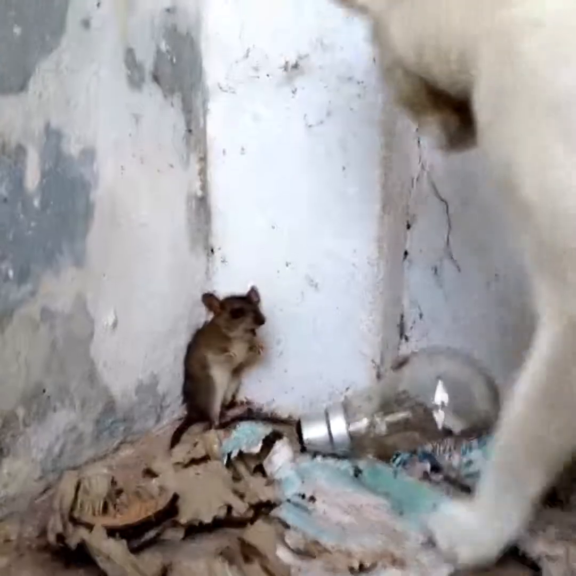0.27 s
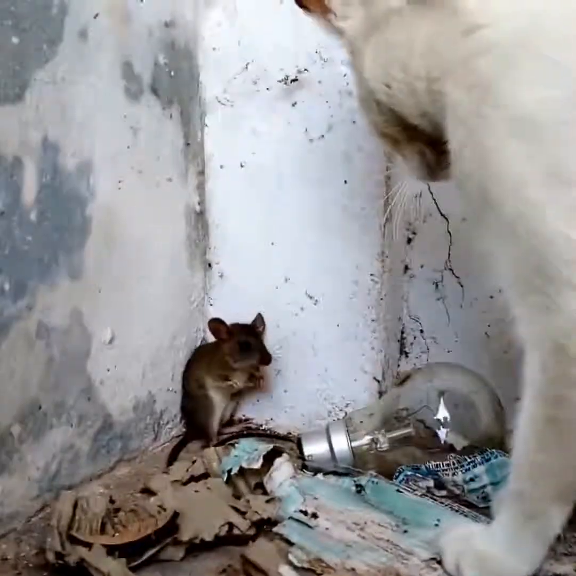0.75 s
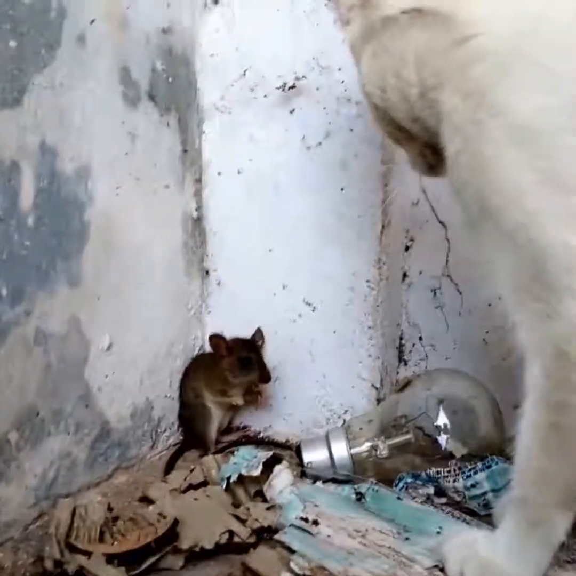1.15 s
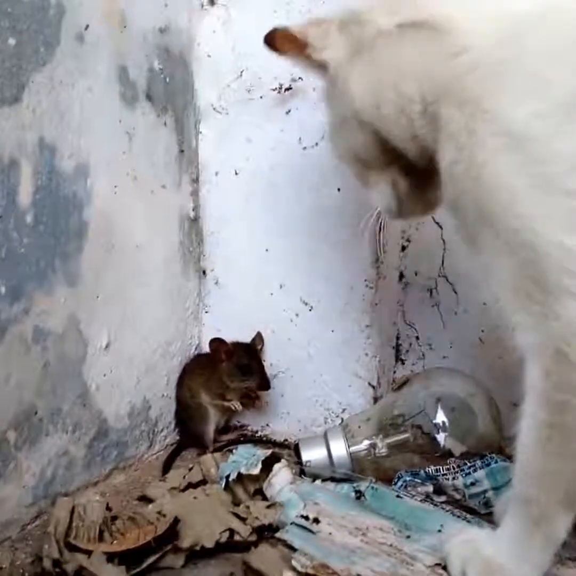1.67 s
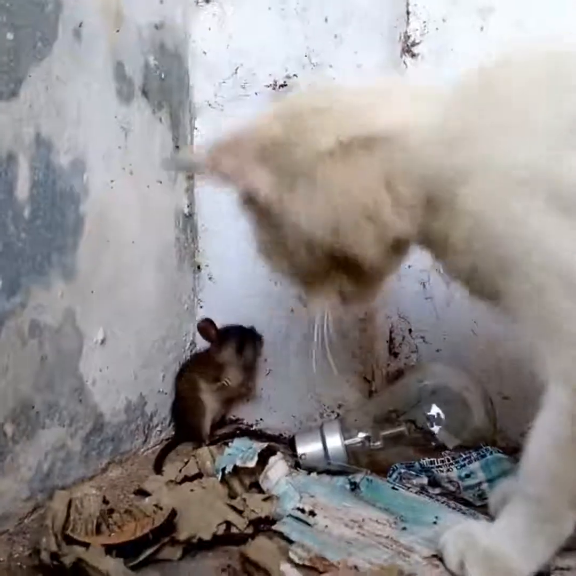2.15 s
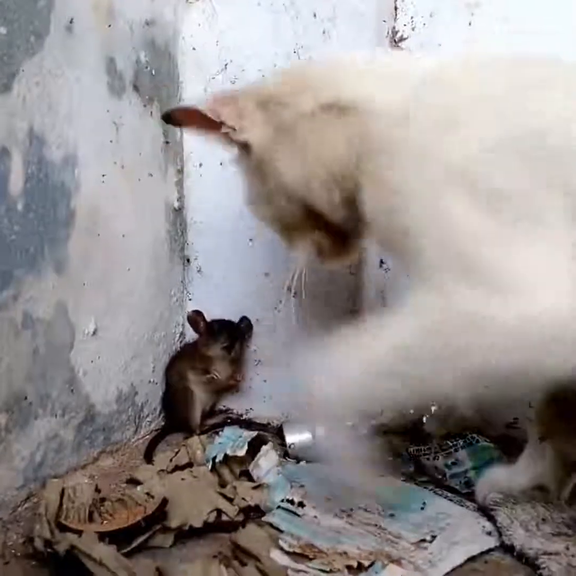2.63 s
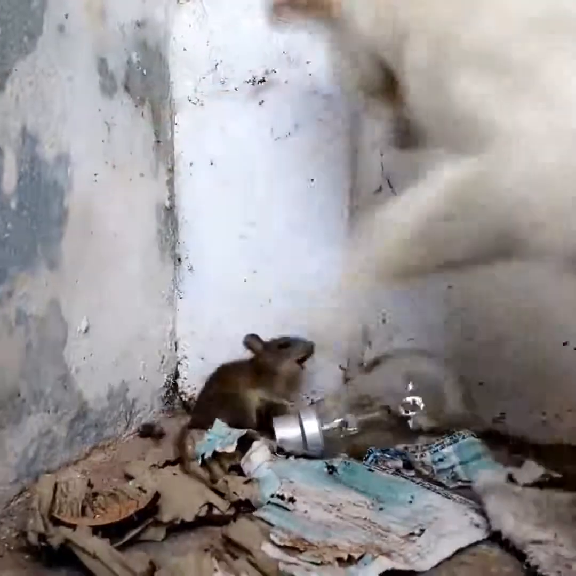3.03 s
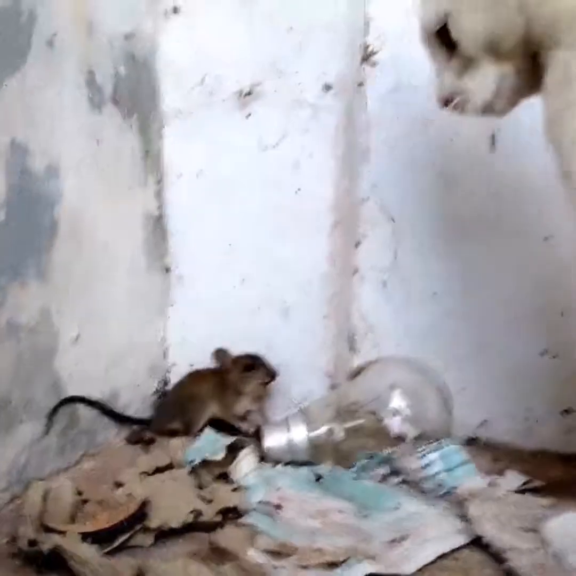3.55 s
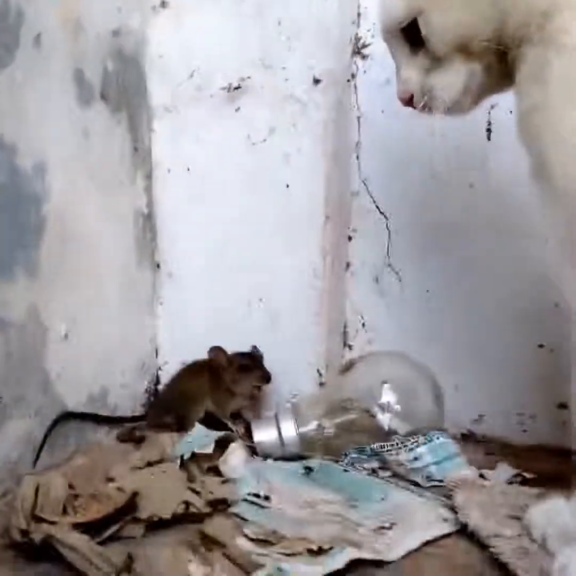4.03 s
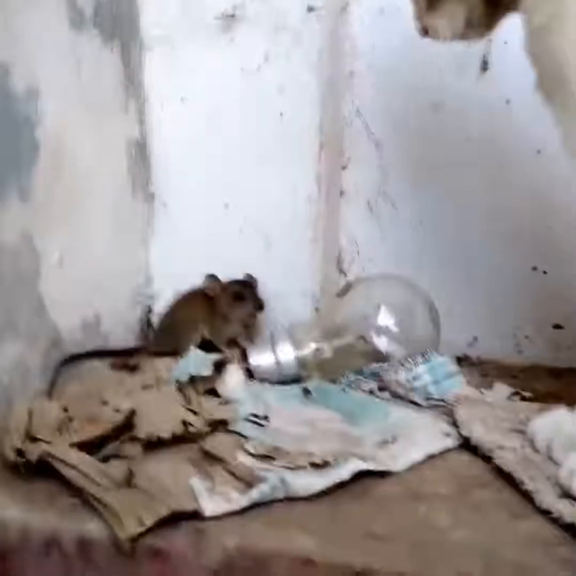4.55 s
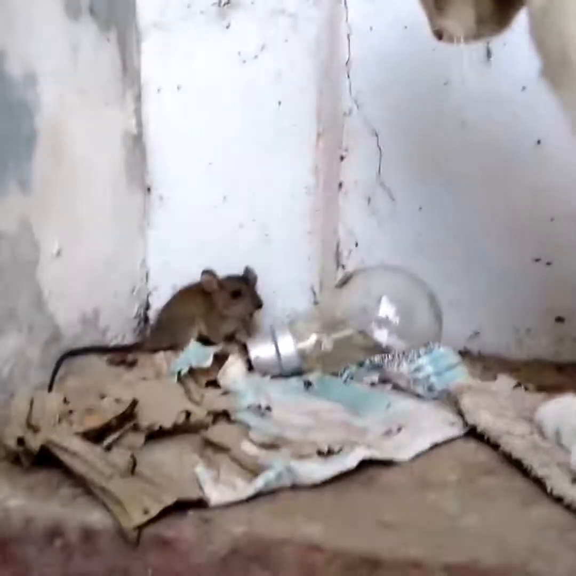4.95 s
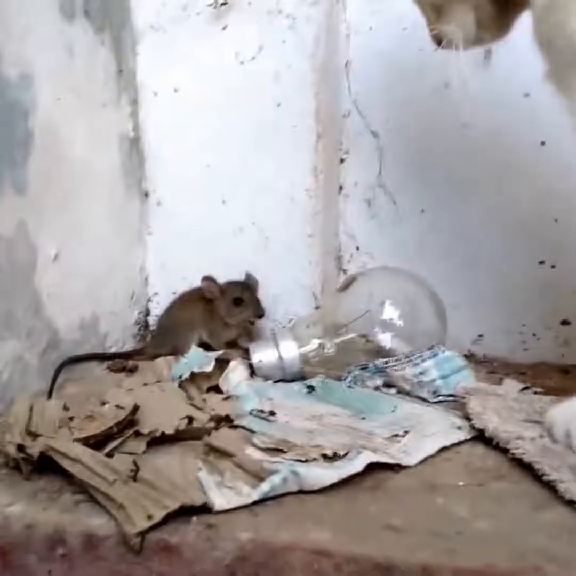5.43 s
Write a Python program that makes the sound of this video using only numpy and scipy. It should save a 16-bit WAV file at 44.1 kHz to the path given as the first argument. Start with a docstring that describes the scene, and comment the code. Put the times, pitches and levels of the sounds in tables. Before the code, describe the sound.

A mouse squeaks very close to a handheld microphone in a bare, hard-walled corner, with quick wall echoes and a short tail. Soft low noise and faint hiss lie underneath. Brief gritty rasps come at 0.0 and 0.2 seconds, then a longer torn shriek from 0.4 to 0.8 that ends alongside a thin whistle. Further cries around 1.0, 1.4 and 1.8 start with a tiny falling chirp or harsh rasp and clear into whistles near 2.8 kilohertz. Short rasps follow at 2.2 and 2.4, a rough cry at 2.6 to 2.9, then a dense scream at 3.0 to 3.2 with crackly paper scuffs. Squeaks continue at 3.3, 3.5, 3.75, 4.1, 4.4, 4.8 and 5.2, with a last whistle at 5.6. From 3.6 to 5.5 a faint hoarse rooster-like call wavers far away. Dull hand bumps, notably at 4.1 and 4.5, and low rumble from 4.5 accompany the end.

```python
"""In the corner of two plastered walls, a cornered mouse squeaks at a cat, close to a handheld camera.
Its cries are built from short falling chirps, harsh rasps (uneven pulses and puffs of noise ringing
in the throat) and thin clean whistles (a few sine waves). Paws scuff on paper as crackly noise,
the hand bumps the camera as dull fading noise, and a low rumble comes in late. A faint long call,
like a rooster's, comes from far away as wavering harmonics, over a soft background noise."""
import sys
import numpy as np
from scipy import signal
from scipy.fft import rfft, irfft, next_fast_len
from scipy.io import wavfile

SR = 44100
rng = np.random.default_rng(int(sys.argv[2]) if len(sys.argv) > 2 else 0)


def store_wav(level_fs):
    """Save 16-bit WAV to argv[1]."""
    pcm = np.round(np.clip(np.atleast_2d(level_fs), -1, 1) * 32767)
    wavfile.write(sys.argv[1], SR, pcm.T.astype(np.int16))


N = 250929  # length in samples

# Harsh part of each cry; the resonance, shriek and hiss levels are relative to the effort:
# start_s, length_s, effort_db, opening_accent_db, swell_s, low_db, middle_db,
# pulse_start_hz, pulse_end_hz, roughness (0 to 1, anything over counts as 1), low_start_hz, low_end_hz,
# middle_start_hz, middle_end_hz, top_hz, top_width_hz, shriek_db, hiss_db
RASPS = [ (0.027, 0.052, -30, -3.5, 0.015, -7, -4, 797, 842, 0.51, 1480, 1800, 4350, 4600, 7220, 1865, -27, -6),
         (0.225, 0.07, -37, -3, 0.0087, -0.5, -2.5, 800, 844.5, 0.56, 1410, 1830, 4800, 4420, 7130, 910, -7, -9.5),
         (0.441, 0.34, -36.5, 2.5, 0.009, -12, -5.5, 940, 983, 0.91, 1520, 1730, 4450, 5340, 7480, 647, -8, -11),
         (0.954, 0.07, -39, -2.5, 0.016, -3.5, -5, 995, 805, 0.96, 1560, 1800, 4900, 5360, 7100, 1320, -4.5, -8.5),
         (1.361, 0.17, -45.5, 1, 0.007, -4.5, -1, 852, 1097, 1.04, 1510, 1950, 5300, 5250, 6870, 1100, 3.5, -7),
         (1.79, 0.043, -49, -3, 0.0082, -27, 1, 917, 820, 0.75, 1600, 1700, 5400, 5030, 6700, 1200, 6.5, -2),
         (2.175, 0.079, -36.5, -3, 0.017, -4, -3.5, 777, 895, 0.75, 1340, 1970, 4550, 4520, 6800, 1250, -10, -8),
         (2.385, 0.063, -33, -1.5, 0.0066, -6.5, -4.5, 816, 863, 0.32, 1490, 1770, 4650, 4430, 6840, 1040, -28, -12),
         (2.634, 0.1, -51.5, 12.5, 0.0074, -14, -3.5, 892, 914, 0.99, 1450, 1800, 5000, 5400, 7340, 1200, 4.5, -8),
         (2.716, 0.15, -42, 2, 0.031, -6, -0.5, 905, 1021, 1.04, 1400, 1710, 5150, 5300, 7200, 1300, 0, -11),
         (3.024, 0.042, -30.5, -0.5, 0.013, -12, 2.5, 1401, 1327, 0.42, 1420, 1350, 4350, 4200, 7700, 900, -13, -9),
         (3.04, 0.089, -37.5, 7.5, 0.0029, -18, -1.5, 1392, 1140, 0.8, 1530, 2180, 4550, 5010, 6950, 1400, -18, -6),
         (3.104, 0.095, -41, -2.5, 0.011, -16, 3, 1196, 1240, 0.9, 2170, 2450, 4400, 4980, 6540, 1500, 0, -9.5),
         (3.316, 0.07, -33.5, -4.5, 0.014, -12, -12, 772, 814, 0.29, 1820, 2000, 4550, 4400, 6720, 1000, -5, -10.5),
         (3.515, 0.079, -45, 1, 0.014, -4.5, -4, 979, 905, 0.89, 1350, 1780, 4800, 4930, 6820, 900, 3, -9),
         (3.746, 0.089, -42.5, 1.5, 0.0083, -11.5, -18, 947, 1044, 1.06, 1380, 2100, 4850, 5250, 6800, 1100, 1.5, -10.5),
         (4.141, 0.067, -37, -0.5, 0.0091, -6.5, -8, 843, 844, 0.92, 1580, 2120, 5100, 5270, 6650, 700, -8, -13.5),
         (4.386, 0.17, -37.5, 1.5, 0.017, -11, -9, 896, 1116, 0.92, 1820, 2200, 4750, 5350, 6880, 1000, -4, -13),
         (4.83, 0.049, -38, 1.5, 0.0098, -6, -9, 1100, 1110, 0.46, 1470, 1730, 5200, 5640, 6700, 1300, -3, -12),
         (5.232, 0.068, -48, -5, 0.012, -16, 2, 914, 807, 0.93, 1490, 1700, 5400, 5300, 6500, 1300, -12, -5),
         ]
# Clean whistles; the level is that of the first harmonic at its loudest, before it wavers:
# start_s, length_s, pitch_hz, scoop_up_hz, level_db, second_harmonic_db and third_harmonic_db (re first)
WHISTLES = [ (0.737, 0.062, 2745, 84, -40, 1, -2), (1.032, 0.11, 2831, 216, -40.5, 0.5, -7),
            (1.108, 0.1, 2798, 123, -40.5, -1, -10), (1.486, 0.1, 2766, 206, -39.5, 4, -5.5),
            (1.781, 0.06, 2630, -120, -42, -6, -8), (1.86, 0.15, 2771, 74, -41, -0.5, -13),
            (2.678, 0.076, 2770, 336, -48.5, 12.5, 0), (2.83, 0.077, 2716, 236, -44, 6.5, 1.5),
            (3.127, 0.079, 2477, 62, -37, -1, 1), (3.795, 0.23, 2750, 337, -35.5, -5.5, -13),
            (4.52, 0.096, 2772, 267, -36, -10, -12), (4.868, .17, 2762, 152, -37.5, -8.5, -20),
            (5.218, 0.15, 2763, -60, -41.5, -6, -15), (5.642, 0.089, 2790, -72, -38, -2.5, -14.5), ]
# Falling chirps: start_s, pitch_hz (halfway down), level_db (at the start)
CHIRPS = [(0.95, 2800, -40.5), (1.357, 2910, -41), (2.627, 2640, -40), (3.513, 2760, -42.5),
          (3.741, 2730, -35), (4.136, 2730, -39), (4.822, 2790, -35.5)]
# Slides of paws on paper: start_s, length_s, level_db
SCUFFS = [(0.282, 0.16, -57.5), (0.361, 0.1, -54.5), (2.857, 0.18, -56), (2.976, 0.037, -45),
          (3.06, 0.019, -44), (3.119, 0.015, -38.5), (3.189, 0.15, -53.5), (3.445, 0.1, -60),
          (4.322, 0.08, -48), (4.357, 0.019, -47), (4.664, 0.073, -56)]
# Bumps of the hand on the camera: start_s, level_db (before it dies away), decay_s
BUMPS = [(0.215, -46, 0.014), (1.199, -41.5, 0.0064), (4.134, -29, 0.0048), (4.474, -34.5, 0.015),
         (4.681, -44.5, 0.042), (4.759, -42, 0.0092), (4.827, -44, 0.012), (4.858, -37, 0.017),
         (5.189, -41, 0.015), (5.534, -34.5, 0.011), (5.627, -45, 0.014)]
# Path of the handling rumble: time_s, level_db
RUMBLE_PATH = [(4.5, -55), (5.69, -52.5)]
# Path of the far call: time_s, pitch_hz, level_db (of the second harmonic, before it wavers)
CROW_PATH = [(3.56, 589, -65), (3.67, 622, -53), (3.79, 642.7, -59), (3.88, 750, -49.5), (3.96, 793, -45.5),
             (4.1, 749, -51.5), (4.24, 771, -47.5), (4.4, 731.6, -48.5), (4.54, 721, -48.5),
             (4.7, 727, -50.5), (4.96, 752, -61.5), (5.16, 738, -53), (5.49, 698, -63.5)]

# Harmonics of the shriek: harmonic_number, level_db
SHRIEK_HARMONICS = [(1, -6), (2, 2.5), (3, -1.5), (4, -7), (6, -2)]
# Tone colour of the breath in a rasp: frequency_hz, level_db
AIR_COLOUR = [(300, -19), (600, -3.5), (900, 2), (1400, 5.5), (2000, -5.5), (2900, -2), (4500, -2.5),
              (6100, -5.5), (8000, -11), (10000, -21), (16000, -40)]
# Tone colour of the hiss at the teeth: frequency_hz, level_db
HISS_COLOUR = [(300, -28), (7000, -22), (8500, 4.5), (10600, -2), (11150, -9.5), (11800, -7), (13300, -9),
               (15000, -1.5), (16000, -19)]
# Tone colour of the rasps, with a steep fall above 8 kHz: frequency_hz, gain_db
RASP_COLOUR = [(700, -1.5), (1700, 0), (3200, 5), (3700, -3), (4150, -4.5), (5400, -1), (5850, 5.5),
               (6400, 1), (8050, -0.5), (8350, -20), (16000, -28)]
# Tone colour of scuffed paper: frequency_hz, level_db
PAPER_COLOUR = [(300, -2), (2000, -10), (4200, 2.5), (7500, -4), (10000, -11.5), (16000, -17)]
# Tone colour of a knock on the camera: frequency_hz, level_db
THUD_COLOUR = [(30, -13), (130, -2.5), (330, -5), (500, -15), (800, -19.5), (3000, -43), (16000, -58)]
# Tone colour of the background: frequency_hz, level_db
BACKGROUND_COLOUR = [(15, 1), (38, -4.5), (60, -6.5), (130, -6), (180, -14.5), (450, -20), (1200, -25.5),
                     (3200, -27.5), (4300, -25.5), (7600, -29.5), (8400, -33.5), (11000, -37.5),
                     (15500, -40.5)]
# How long the room rings: frequency_hz, time_to_fall_60_db_s
ROOM_DECAY = [(200, 0.39), (1500, 0.12), (7000, 0.18), (16000, 0.11)]
# Bands where the two channels swing against each other; side level above that of the other bands:
# centre_hz, half_width_hz, near_side_db, far_side_db
OPPOSED_BANDS = [(147, 685, 25.5, 28.6), (2642, 640, 36.5, 59.6), (5290, 1177, 32, 33.7),
                 (7566, 1160, 24.5, 23.4), (10120, 1430, 25, 26), (12500, 1510, 22, 23.6),
                 (15400, 1700, 27, 27)]

# Rasp loudness: it swells from SWELL_DB down, and falls by RELEASE_DB as the push ends
ATTACK_S, SWELL_DB, RELEASE_S, RELEASE_DB = 0.0028, -5, 0.033, -14
SETTLE_S = 0.03175  # the opening accent and the bite of the middle resonance die away
ONSET_BEND = 0.0597  # the pulses start this share of their rate high, then drop
GRIT_DB = 1.1  # strength of the uneven beats
# Throat: low gain in dB per dB of accent; the low one also dies later and glides slowly at first
BITE_DB, LOW_PER_ACCENT, LINGER_DB, LOW_GLIDE_POWER = 4.5, 1, 2, 1.3
TOP_BEND_HZ, TOP_BEND_S = 740, 0.026  # the top resonance bends upward as the push ends
AIR_DB, SHRIEK_JITTER = -5.5, 0.02
TORN_DB, TORN_HZ = 1.5, 45  # how far and how fast a torn voice comes and goes
# Whistle: it scoops up or down to its pitch, then sags; its level is an arch, a crest under 1 peaks early
SCOOP_S, SAG_HZ, WHISTLE_ENDS_DB, WHISTLE_CREST = 0.022, 73.8, -13, 0.54
HOARSE_JITTER, CLEARING_S = 0.03, 0.036  # hoarse start and how fast it clears
WAVER, FOURTH_DB = 0.0068, -15.5  # share of the pitch; fourth harmonic re third
# Chirp: falls by a share of its pitch while it fades; harmonics re first
CHIRP_S, CHIRP_FALL, CHIRP_FADE_DB, CHIRP_SECOND_DB, CHIRP_THIRD_DB = 0.014, 0.22, -7.5, 0, -12.5
# Far call: harmonics re second; the upper ones swell late
CROW_HOARSE_START, CROW_HOARSE_END = 0.85, 0.3
CROW_FIRST_START_DB, CROW_FIRST_END_DB = -6.5, -12.5
CROW_UPPER_DB, CROW_BRIGHT_DB, CROW_BRIGHT_S, CROW_BRIGHT_WIDTH_S = -18, 13.5, 5.23, 0.5
# Midway through the call a second, lower voice splits off
SPLIT_S, SPLIT_WIDTH_S, SPLIT_RATIO, SPLIT_FIRST_DB, SPLIT_SECOND_DB = 4.18, 0.69, 0.87, -10, -13
RUMBLE_HZ, RUMBLE_WIDTH_HZ = 40, 10
WALL_DB = -11  # each quick echo
EDGE_HZ = 15850  # top of the recorder's range


def mouse():
    """Rasps, whistles and chirps from one throat."""
    out = np.zeros(N)
    for voice, table in (rasp, RASPS), (whistle, WHISTLES), (chirp, CHIRPS):
        for start_s, *row in table:
            add(out, start_s, voice(*row))
    return out


def rasp(length, effort_db, accent_db, swell_s, low_db, middle_db, start_hz, end_hz, rough,
         low_start_hz, low_end_hz, middle_start_hz, middle_end_hz, top_hz, top_width_hz, shriek_db, hiss_db):
    """Overblown folds beat slower than a whistle; pulses and puffs ring three throat resonances."""
    t = np.arange(0, length, 1 / SR)
    count, rough = len(t), np.clip(rough, 0, 1)
    opening = np.exp(-t / SETTLE_S)
    closing = np.maximum(1 - (length - t) / RELEASE_S, 0)
    swell_db = SWELL_DB * np.maximum(1 - t / swell_s, 0)
    level_db = effort_db + accent_db * opening + swell_db + RELEASE_DB * closing

    # The folds beat unevenly; turns counts the beats
    wander = (.012 + .085 * rough ** 2) * drift(count, 80) + (.014 + .035 * rough) * drift(count, 500)
    rate_hz = np.linspace(start_hz, end_hz, count) * (1 + wander + ONSET_BEND * opening ** 4)
    turns = np.cumsum(rate_hz) / SR
    pulses = sum(np.cos(2 * np.pi * k * turns) * gain_of(3 * drift(count, 90))
                 for k in np.arange(1, EDGE_HZ / end_hz))
    puffs = evened((.16 + np.exp(-(turns % 1) / .4)) * rng.standard_normal(count))
    drive = evened(pulses) + .3 * rough * puffs

    low_hz = low_start_hz + (low_end_hz - low_start_hz) * (t / length) ** LOW_GLIDE_POWER
    low_gain = gain_of(low_db + LOW_PER_ACCENT * accent_db * opening + LINGER_DB * closing)
    low = resonance(drive, low_hz, 1150) * gain_of(1.6 * drift(count, 92)) * low_gain
    middle_hz = np.linspace(middle_start_hz, middle_end_hz, count)
    middle = resonance(drive, middle_hz, 1150) * torn(count) * gain_of(middle_db + BITE_DB * opening)
    top = resonance(drive, top_hz + TOP_BEND_HZ * np.exp((t - length) / TOP_BEND_S), top_width_hz)
    # The second harmonic of the shriek locks to the middle resonance
    scream = shriek(count, middle_hz / 2, turns) * torn(count) * gain_of(shriek_db)
    air = colour(drive + .5 * rough * puffs, AIR_COLOUR) * gain_of(AIR_DB)
    voiced = filtered(top + middle + low + scream + air, RASP_COLOUR)

    teeth = gain_of(hiss_db) * colour(drive + puffs, HISS_COLOUR)  # turbulence at the teeth
    grit = evened(gain_of(GRIT_DB * drift(count, 450)))  # strong and weak beats
    return faded(gain_of(level_db) * grit * (voiced + teeth), ATTACK_S)


def shriek(count, pitch_hz, beats):
    """The whistle driven into chaos: its pitch jumps and the slow beats chop it into sidebands."""
    jitter = SHRIEK_JITTER * (drift(count, 500) + .9 * drift(count, 60))
    phase = 2 * np.pi * np.cumsum(pitch_hz * (1 + jitter)) / SR
    tone = sum(gain_of(db) * np.sin(round(k) * phase) for k, db in SHRIEK_HARMONICS)
    return evened(tone * (1 + .5 * np.cos(2 * np.pi * beats)))


def whistle(length, pitch_hz, scoop_hz, level_db, second_db, third_db):
    """A tone that scoops hoarsely onto its pitch, clears and swells, then sags as the push runs out."""
    t = np.arange(0, length, 1 / SR)
    along = t / length
    hz = pitch_hz - scoop_hz * np.exp(-t / SCOOP_S) - SAG_HZ * along ** 2
    hz *= 1 + HOARSE_JITTER * np.exp(-t / CLEARING_S) * drift(len(t), 500)
    arch_db = WHISTLE_ENDS_DB * (2 * along ** WHISTLE_CREST - 1) ** 2
    return clean_tone(hz, level_db + arch_db, second_db, third_db)


def chirp(pitch_hz, level_db):
    """A brief tone that falls and fades, as before the voice breaks."""
    along = np.linspace(0, 1, round(CHIRP_S * SR))
    hz = pitch_hz * (1 + CHIRP_FALL * (.5 - along))
    return clean_tone(hz, level_db + CHIRP_FADE_DB * along, CHIRP_SECOND_DB, CHIRP_THIRD_DB)


def clean_tone(hz, level_db, second_db, third_db):
    """The folds settle into one clean tone that wavers in pitch and brightness."""
    count = len(hz)
    waver = WAVER * drift(count, 30) + .003 * drift(count, 600)
    phase = 2 * np.pi * np.cumsum(hz * (1 + waver)) / SR
    harmonics_db = [0, second_db, third_db, third_db + FOURTH_DB]
    tone = sum(gain_of(db + 2.2 * drift(count, 40)) * np.sin(k * phase)
               for k, db in enumerate(harmonics_db, 1))
    return faded(gain_of(level_db) * tone, .004)


def scuffs():
    """Short slides over dry paper: noise in uneven grains that swells and fades."""
    out = np.zeros(N)
    for start_s, length, db in SCUFFS:
        count = round(length * SR)
        grains = rng.standard_normal(count) * gain_of(4 * drift(count, 780))
        slide = np.hanning(count) * np.sqrt(2)
        add(out, start_s, gain_of(db) * colour(grains, PAPER_COLOUR) * slide)
    return out


def bumps():
    """Dull knocks through the camera's case: low noise that starts fast and dies away."""
    out, t = np.zeros(N), np.arange(SR // 8) / SR
    for start_s, db, decay_s in BUMPS:
        thud = colour(rng.standard_normal(len(t)), THUD_COLOUR)
        shape = np.exp(-t / decay_s) * (1 - np.exp(-t / 0.00044))
        add(out, start_s, gain_of(db) * thud * shape)
    return out


def rumble():
    """A low wobble through the case once the camera has been moved: a deep tone of drifting strength."""
    start_s, (level_db,) = curves(RUMBLE_PATH)
    count, out = len(level_db), np.zeros(N)
    tone = np.sin(2 * np.pi * RUMBLE_HZ * np.arange(count) / SR)
    wobble = drift(count, RUMBLE_WIDTH_HZ) * tone
    add(out, start_s, faded(gain_of(level_db) * evened(wobble), .02))
    return out


def far_crow():
    """A hoarse held call of drifting harmonics, split in two midway and brighter towards its end."""
    start_s, (hz, level_db) = curves(CROW_PATH)
    count, out = len(hz), np.zeros(N)
    t = start_s + np.arange(count) / SR
    hoarse = np.linspace(CROW_HOARSE_START, CROW_HOARSE_END, count)
    jitter = hoarse * (.012 * drift(count, 40) + .022 * drift(count, 300))
    phase = 2 * np.pi * np.cumsum(hz * (1 + jitter)) / SR

    brightening = np.exp(-((t - CROW_BRIGHT_S) / CROW_BRIGHT_WIDTH_S) ** 2)
    upper_db = CROW_UPPER_DB + CROW_BRIGHT_DB * brightening
    first_db = np.linspace(CROW_FIRST_START_DB, CROW_FIRST_END_DB, count)
    harmonics_db = {1: first_db, 2: 0, 3: upper_db - 12, 6: upper_db, 12: upper_db - 6}
    # Each harmonic fades in and out on the way
    call = sum(gain_of(db) * evened(gain_of(3.5 * drift(count, 16))) * np.sin(k * phase)
               for k, db in harmonics_db.items())

    lower = gain_of(SPLIT_FIRST_DB) * np.sin(SPLIT_RATIO * phase)
    lower += gain_of(SPLIT_SECOND_DB) * np.sin(2 * SPLIT_RATIO * phase)
    call += lower * torn(count) * np.exp(-((t - SPLIT_S) / SPLIT_WIDTH_S) ** 2)
    call *= 1 + .45 * hoarse * drift(count, 150)
    add(out, start_s, faded(call * gain_of(level_db + 3.5 * drift(count, 73)), 0.017))
    return out


def background():
    """Low rumble and soft hiss, made of coloured noise that swells a little."""
    swell_db = .8 * drift(N, 4)
    # This level is before scene() blends the shared and separate parts
    return gain_of(-47.0 + swell_db) * colour(rng.standard_normal(N), BACKGROUND_COLOUR)


def room(x, tail_db):
    """Quick echoes from the two near walls, and a short tail that lasts longest in the bass."""
    size = SR // 2
    taps = rng.standard_normal(size) * (rng.random(size) < 3000 / SR)  # about 3000 reflections a second
    hz, t, bands = signal.stft(taps, SR, nperseg=256)
    decay = gain_of(-60 * t / read(ROOM_DECAY, hz)[:, None])
    tail = signal.istft(bands * decay, SR, nperseg=256)[1]
    echoes = gain_of(tail_db) * tail / np.linalg.norm(tail)
    walls = (rng.uniform(.001, .009, size=6) * SR).astype(int)
    echoes[walls] += gain_of(WALL_DB) * rng.choice([-1, 1], size=6)
    return signal.fftconvolve(x, echoes)[:N]


def stereo(ports, order):
    """One port feeds the middle, the other the sides, strongest in some bands; order 0 is near, 1 far."""
    hz = np.fft.rfftfreq(N, 1 / SR)
    side_db = -25.5 + sum(db[order] * np.exp(-((hz - centre) / width) ** 2)
                          for centre, width, *db in OPPOSED_BANDS)
    angle = np.arctan(gain_of(side_db))  # shares the energy between middle and side
    middle = irfft(rfft(ports[0]) * np.cos(angle), N)
    side = irfft(rfft(ports[1]) * np.sin(angle) * np.exp(1.9j), N)  # phase turned by 1.9 radians
    return np.array([middle + side, middle - side])


def gain_of(db):
    """Turns decibels into amplitude."""
    return 10 ** (np.asarray(db) / 20)


def evened(x):
    """Scales a sound to an average strength (rms) of 1."""
    return x / np.sqrt(np.mean(x ** 2) + 1e-20)


def read(points, hz):
    """Reads a table between its points, on a log-frequency axis."""
    f, value = np.transpose(points)
    return np.interp(np.log(hz + 1), np.log(f + 1), value)


def curves(rows):
    """Gives the start time of a table and its other columns, sample by sample."""
    s, *columns = np.transpose(rows)
    t = np.arange(s[0], s[-1], 1 / SR)
    return s[0], [np.interp(t, s, c) for c in columns]


def add(mix, start_s, sound):
    """Adds a sound to the mix at its start time, cut off where the mix ends."""
    part = mix[max(round(start_s * SR), 0):][:len(sound)]
    part += sound[:len(part)]


def filtered(x, points):
    """Passes a sound through a table of gains."""
    gains = gain_of(read(points, np.fft.rfftfreq(len(x), 1 / SR)))
    return irfft(rfft(x) * gains, len(x))


def colour(x, points):
    """Filters a sound by a table of levels, then evens it to rms 1."""
    return evened(filtered(x, points))


def drift(count, hz):
    """Smooth random motion of rms about 1, which gets weaker towards hz and beyond."""
    size = next_fast_len(count + 8192)
    smoothing = np.exp(-(np.fft.rfftfreq(size, 1 / SR) / hz) ** 2)
    return evened(irfft(rfft(rng.standard_normal(size)) * smoothing, size))[:count]


def torn(count):
    """An uneven gain of rms 1 for a voice that catches and lets go."""
    return evened(gain_of(TORN_DB * drift(count, TORN_HZ)))


def resonance(x, hz, width_hz):
    """A wavering throat resonance: shifted down to zero, smoothed and shifted back, at rms 1."""
    wavering_hz = hz + .14 * width_hz * drift(len(x), 50)
    turn = np.exp(2j * np.pi * np.cumsum(wavering_hz) / SR)
    smooth = signal.butter(2, np.clip(width_hz / 2, 50, 5000), fs=SR, output="sos")
    return evened((turn * signal.sosfilt(smooth, x / turn)).real)


def faded(x, seconds):
    """Softens both ends."""
    return x * signal.windows.tukey(len(x), min(2 * seconds * SR / len(x), 1))


def scene():
    """Two microphone ports share the direct sound; echoes, rumble and part of the background differ."""
    close, crow, knocks, shared = mouse() + scuffs(), far_crow(), bumps(), background()
    near = [close + room(close, tail_db=-7.5) + knocks for port in range(2)]
    far = [crow + room(crow, tail_db=0.5) + 0.57 * shared + 0.75 * background() + rumble()
           for port in range(2)]
    return stereo(near, order=0) + stereo(far, order=1)


def record(dry):
    """The recorder's band limit: a steep low-pass filter."""
    low_pass = signal.firwin(511, EDGE_HZ, window=("kaiser", 9), fs=SR)
    return signal.oaconvolve(dry, low_pass[None], "same", axes=1)


dry = scene()
out = record(dry)
store_wav(out)
```